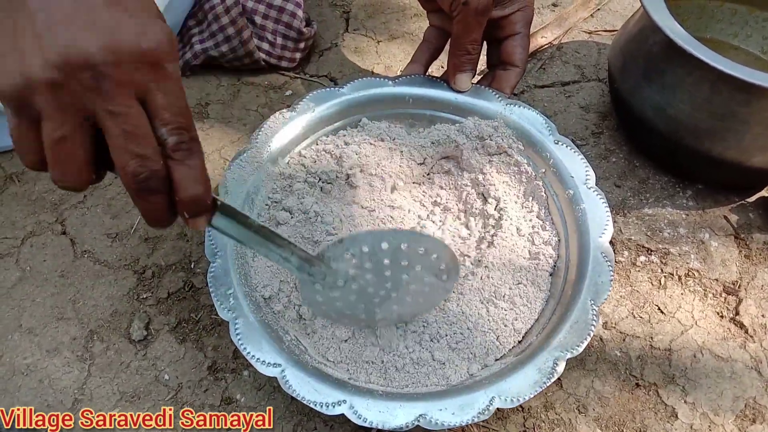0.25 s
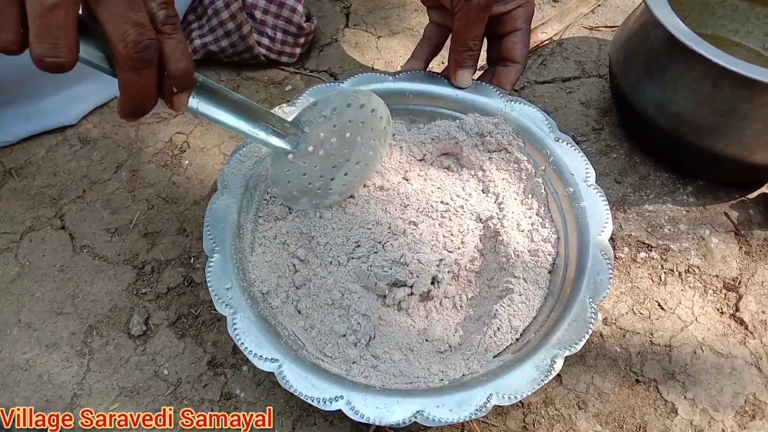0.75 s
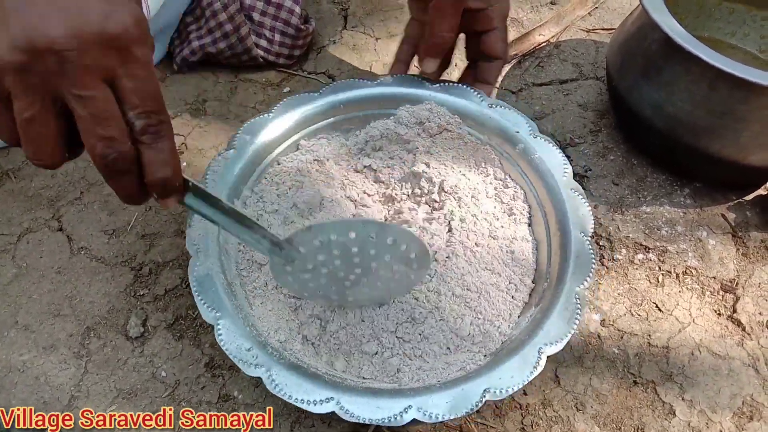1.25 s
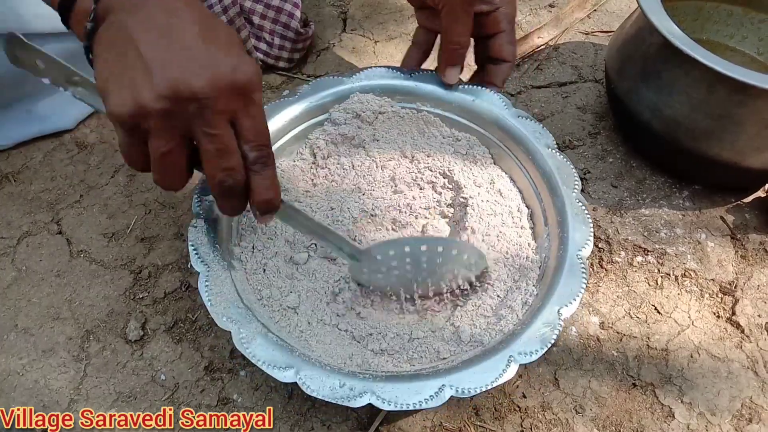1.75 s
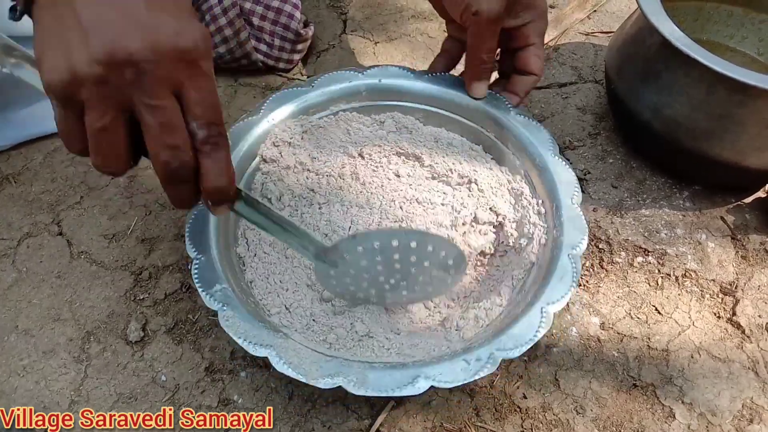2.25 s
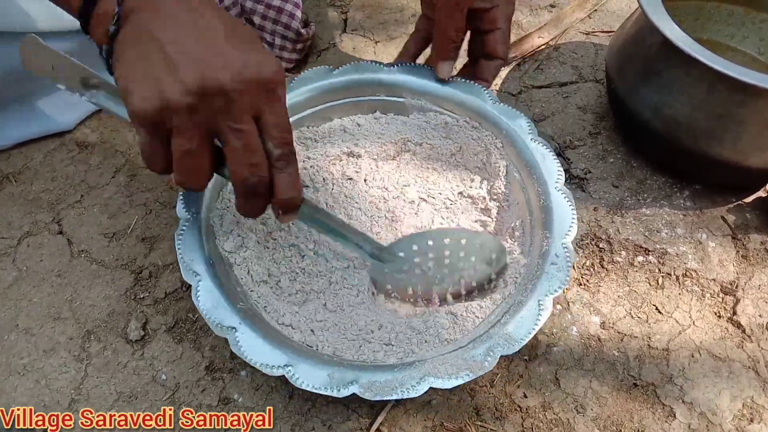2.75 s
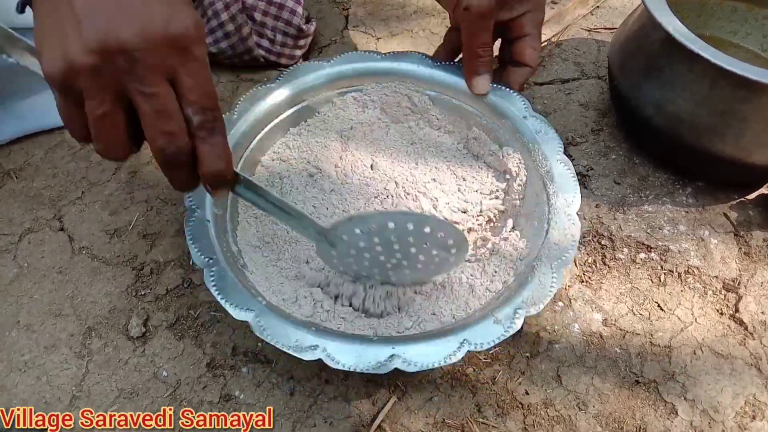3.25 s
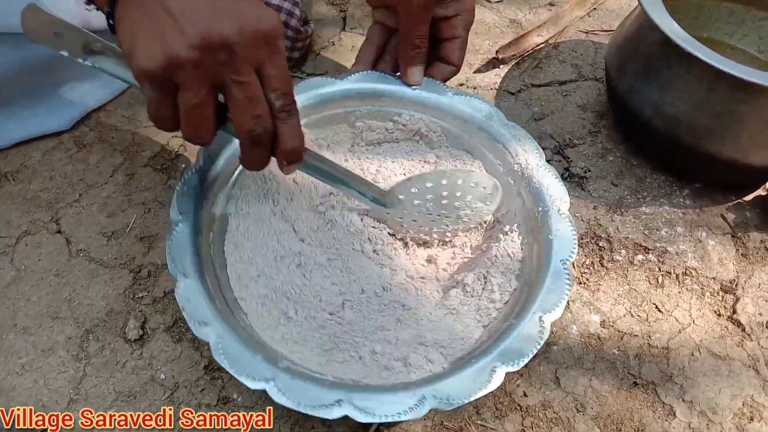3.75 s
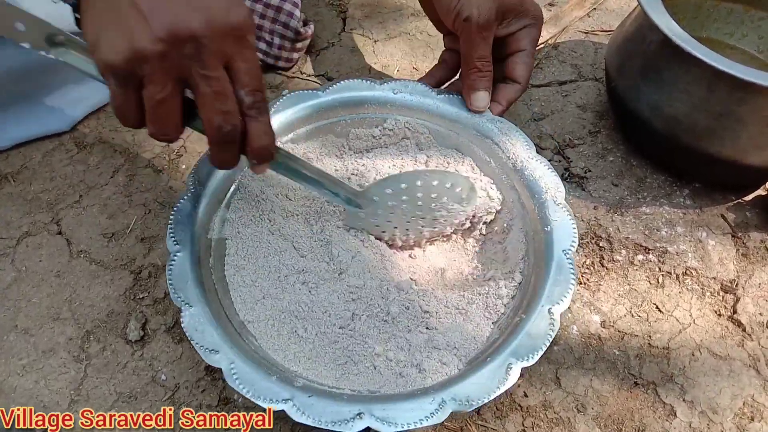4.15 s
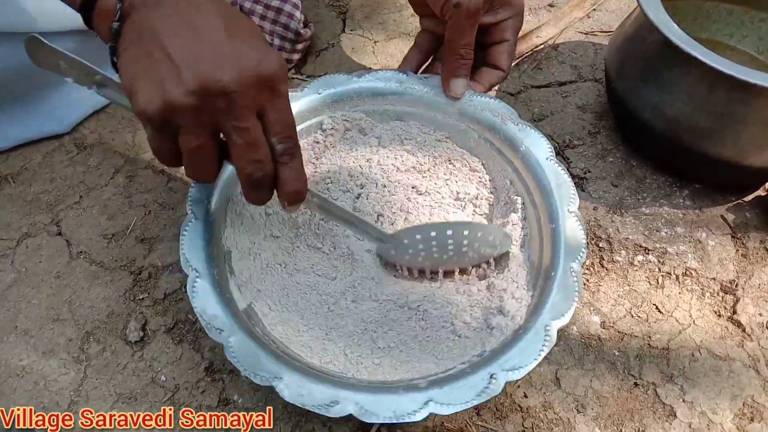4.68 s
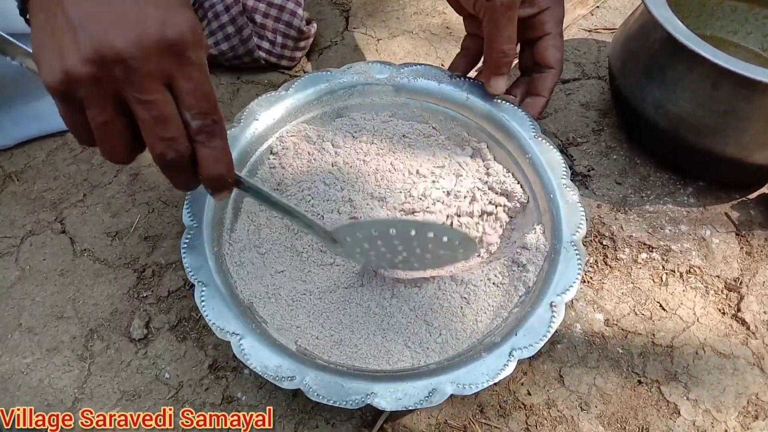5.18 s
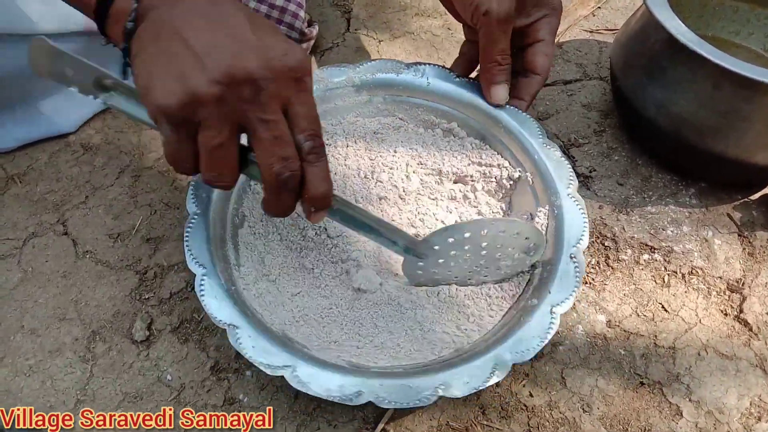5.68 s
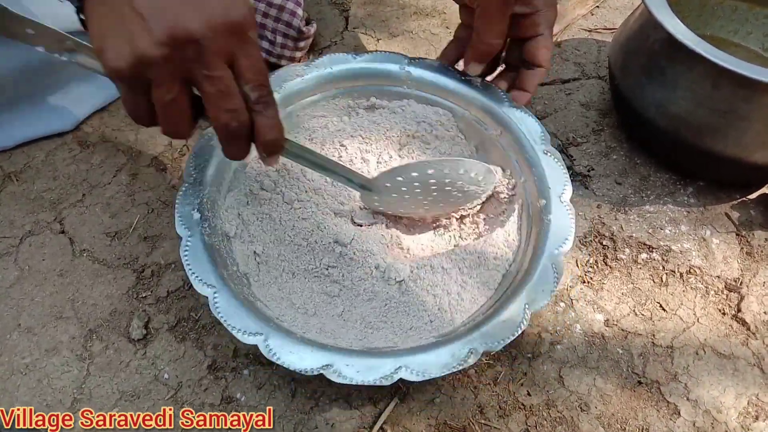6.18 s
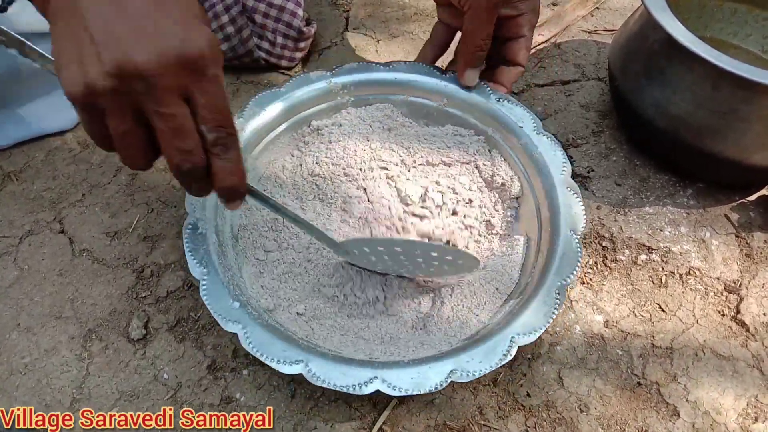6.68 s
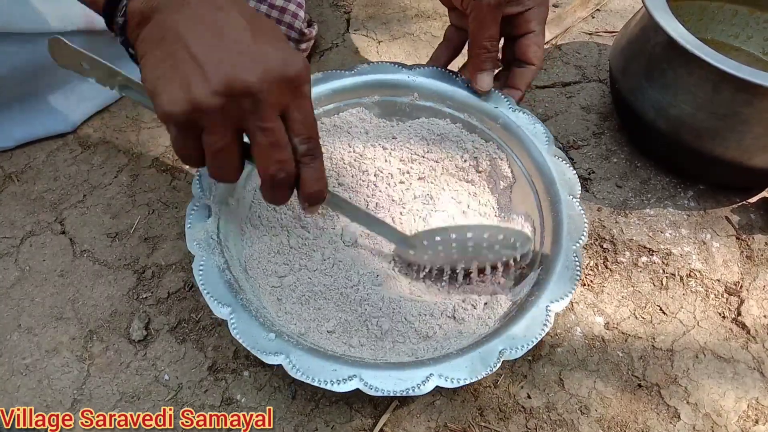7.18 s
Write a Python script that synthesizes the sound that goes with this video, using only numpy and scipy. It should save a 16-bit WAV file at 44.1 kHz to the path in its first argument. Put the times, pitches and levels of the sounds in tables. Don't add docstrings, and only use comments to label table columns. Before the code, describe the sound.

Dense, bright chick peeping outdoors, with a metal skimmer clinking, thudding and scraping through dry flour on a plate above a faint engine throb.

```python
import sys
import numpy as np
from scipy import signal
from scipy.fft import rfft, irfft, next_fast_len
from scipy.io import wavfile
from scipy.ndimage import uniform_filter1d, map_coordinates

SR = 44100
rng = np.random.default_rng(int(sys.argv[2]) if len(sys.argv) > 2 else 0)


def transcribe(u):
    v = np.clip(np.atleast_2d(u).T, -1, 1)
    q = np.round(v * 32767).astype(np.int16)
    wavfile.write(sys.argv[1], SR, q)


def gain_from_decibels(decibels):
    exponent = np.asarray(decibels, float) / 20
    return 10 ** exponent


N = 327221


def unit(x):
    return x / np.sqrt(np.mean(x ** 2) + 1e-20)


def along(points, hz):
    f, v = np.transpose(points)
    return np.interp(np.log(hz + 1), np.log(f + 1), v)


def wobble(rate):
    knots = rng.standard_normal(int(N * rate / SR) + 4)
    return map_coordinates(knots, [np.arange(N) * rate / SR])


def filtered(x, response):
    m = next_fast_len(N + SR // 2)
    hz = np.fft.rfftfreq(m, 1 / SR)
    return irfft(rfft(x, m) * response(hz), m)[..., :N]


def coloured(x, spectrum):
    return filtered(x, lambda hz: gain_from_decibels(along(spectrum, hz)))


def resonant(x, modes):
    def response(hz):
        total = 0
        for k, (centre, width, db) in enumerate(modes):
            mode = 1j * hz * width / (centre ** 2 - hz ** 2 + 1j * hz * width)
            total = total + (-1) ** k * gain_from_decibels(db) * mode
        return total
    return filtered(x, response)


def add(track, s, sound):
    at = round(s * SR)
    sound = sound[max(-at, 0):]
    part = track[max(at, 0):][:len(sound)]
    part += sound[:len(part)]


def patchy(x, patchy_db):
    z = signal.stft(x, nperseg=256)[2]
    field = uniform_filter1d(rng.standard_normal(z.shape), size=5, axis=0)
    field = uniform_filter1d(field, size=8, axis=1)
    return signal.istft(z * gain_from_decibels(patchy_db * unit(field)), nperseg=256)[1][:N]


# (frequency [Hz], density [dB per Hz])
AIR_SPECTRUM = [(40, -6.5), (110, 8), (260, -18.5), (500, -24), (1000, -32), (1250, -11.5), (1700, -19.5),
                (2400, -22.5), (4500, -33.5), (6500, -25), (10500, -37.5), (15000, -36)]


def open_air():
    noise = patchy(rng.standard_normal(N), 3.5)
    return gain_from_decibels(-56 + 1.5 * wobble(6.5)) * unit(coloured(noise, AIR_SPECTRUM))


# (time [s], rate [firings per s])
ENGINE_SPEED = [(0, 17.4), (1, 18.7), (2, 18.534), (3, 18.049), (3.9, 17.285), (4.7, 16.23), (5.4, 15.984),
                (6.3, 16.429), (7.42, 17.065)]
# (frequency [Hz], width [Hz], level [dB])
EXHAUST_PIPE = [(70, 16, -1.5), (110, 50, -4), (176, 77, -12.5)]


def engine():
    s, rate = np.transpose(ENGINE_SPEED)
    firings = np.cumsum(np.interp(np.arange(N) / SR, s, rate)) / SR
    half_cycle = np.floor(2 * (firings + .112))
    pulses = np.diff(half_cycle, prepend=half_cycle[0])
    beat = pulses * np.where(half_cycle % 2, -.25, 1) * gain_from_decibels(1.3 * wobble(24))
    throb = resonant(resonant(beat, EXHAUST_PIPE), [(109.7, 45, 0)])
    return gain_from_decibels(np.linspace(-57, -52.5, N)) * unit(throb)


# (time [s], length [s], pitch [Hz], mid-note sag [Hz], level [dB])
FAR_BIRD_CALLS = [
    (0.108, 0.16, 1250, -1.5, -57.5),
    (1.3, 0.196, 1230, 30.5, -55.5),
    (5.672, 0.13, 3090, 203, -49),
    (5.788, 0.23, 1720, 57, -57),
    (5.871, 0.12, 3430, 398, -49.5),
    (6.266, 0.18, 1714, 3, -58.5),
    (6.66, 0.21, 1714, 5.5, -59),
]


def far_bird():
    out, drift, hoarse = np.zeros(N), wobble(60), wobble(200)
    for s, length, pitch_hz, sag_hz, db in FAR_BIRD_CALLS:
        span = round(s * SR) + np.arange(round(length * SR))
        arch = np.hanning(len(span))
        hz = (pitch_hz - sag_hz * arch) * (1 + 0.019 * drift[span])
        tone = np.sin(2 * np.pi * np.cumsum(hz) / SR)
        add(out, s, gain_from_decibels(db + 2.55 * hoarse[span]) * arch ** 0.19 * tone)
    return out


# (frequency [Hz], t60 [s])
YARD_DECAY = [(2000, 0.13), (5000, 0.22)]


def yard(x, piece=8192):
    out = np.zeros(N)
    for at in range(0, N, piece):
        hz, t, z = signal.stft(rng.standard_normal(SR // 3), SR, nperseg=256)
        decay = gain_from_decibels(-60 * t / along(YARD_DECAY, hz)[:, None])
        tail = signal.istft(z * decay, SR, nperseg=256)[1]
        tail /= np.linalg.norm(tail)
        add(out, at / SR + .004, signal.fftconvolve(x[at:at + piece], tail))
    return out


# (time [s], length [s], start [Hz], bend of the fall, level [dB])
NEAR_PEEPS = [(.005, 0.17, 5997, 3.3, -35.5), (0.377, 0.2, 6173, 2.37, -37), (0.583, 0.13, 6100, 2.9, -39),
              (0.725, 0.24, 5724, 3.9, -34.5), (0.912, 0.1397, 6300, 2.56, -37),
              (1.187, 0.12, 4833, 4.44, -33.5), (1.203, .19, 5990, 2.8, -33.5),
              (1.434, .15, 6690, 1.9, -40.5), (1.666, 0.19, 5920, 3.3, -33), (2, .17, 5930, 3.17, -34),
              (2.363, 0.18, 5913, 3.36, -34), (2.73, .19, 6090, 3.1, -32.5),
              (2.917, .14, 5350, 2.37, -41.5), (3.06, 0.16, 6040, 2.53, -32), (3.07, .2, 5750, 4.33, -42),
              (3.393, 0.19, 6200, 2.43, -35), (3.79, .21, 6170, 3.7, -36), (4.186, 0.22, 6260, 2.43, -38),
              (4.54, .15, 6120, 3.5, -34.5), (4.73, 0.18, 5650, 3.9, -42), (4.899, 0.17, 5987, 3.84, -34),
              (4.935, 0.21, 5300, 2.3, -44), (5.125, .145, 6050, 2.7, -47.5),
              (5.411, 0.24, 6120, 2.25, -43), (5.718, 0.2, 5900, 3.85, -43.5),
              (6.129, 0.17, 6050, 2.6, -38), (6.445, 0.15, 6080, 3.2, -33), (6.594, 0.14, 5700, 3.1, -39),
              (6.8, .19, 5980, 3.23, -36.5), (7.037, .19, 5800, 3.1, -41.5), (7.132, .18, 5880, 3.7, -32.5)]
# (time [s], length [s], start [Hz], end [Hz], level [dB])
SHORT_PEEPS = [(0.205, .11, 5900, 3500, -43), (0.295, 0.098, 4710, 3010, -42),
               (0.315, .09, 4800, 4730, -56), (.595, 0.047, 3480, 2920, -34), (1.2, 0.076, 4740, 3200, -48),
               (1.433, 0.073, 4770, 2400, -45), (1.416, .06, 5500, 5090, -39),
               (1.669, .09, 5000, 2900, -37), (2.042, 0.042, 4700, 3360, -34),
               (2.129, 0.19, 5600, 5340, -40.5), (2.308, 0.07, 5380, 3900, -52),
               (2.419, 0.086, 5050, 3136, -41.5), (2.65, .1, 5050, 3810, -36),
               (3.257, 0.074, 5750, 5740, -48), (3.345, 0.17, 5240, 5050, -36.5),
               (3.432, 0.061, 5000, 3340, -35), (3.82, 0.07, 5450, 4000, -41),
               (3.86, 0.11, 4840, 3360, -58), (4.234, .08, 5380, 4900, -33),
               (4.271, 0.085, 4501, 2630, -36.5), (4.392, 0.078, 5960, 5340, -48),
               (4.458, 0.21, 6200, 3460, -42.5), (4.499, 0.097, 5370, 3770, -39.5),
               (4.828, .13, 4500, 3060, -51), (5.721, .14, 5270, 3300, -53),
               (5.793, 0.069, 4790, 4700, -35), (6.081, 0.073, 4260, 3740, -40.5),
               (6.316, 0.065, 4920, 4800, -52), (6.389, 0.076, 5000, 3500, -48),
               (6.74, 0.059, 5200, 4040, -57), (6.75, 0.15, 5620, 5400, -42),
               (7.001, 0.076, 5460, 3950, -46), (7.042, 0.091, 6100, 3760, -39),
               (7.352, 0.089, 4770, 3390, -42)]
# (time [s], length [s], start [Hz], level [dB])
LATE_PEEPS = [(0.119, 0.25, 5910, -47.5), (0.656, .2, 5700, -45), (1.133, 0.098, 5590, -45.5),
              (1.569, 0.2, 5980, -47), (2.383, .14, 5350, -46.5), (3.655, 0.21, 6320, -46.5),
              (5.358, 0.14, 6170, -34.5), (6.264, .22, 5670, -42.5), (7.304, .14, 5600, -41)]
# (time [s], length [s], start [Hz], level [dB])
ROUND_PEEPS = [(0.277, 0.25, 5920, -43), (0.706, 0.093, 6510, -43), (4.676, 0.13, 6310, -50.5),
               (1.833, 0.13, 6120, -41), (2.291, 0.08, 5610, -45.5), (2.594, 0.22, 6120, -40.5),
               (3.409, .25, 5995, -45), (3.969, 0.19, 6030, -45.5), (4.135, 0.049, 5440, -33.5),
               (4.72, 0.063, 5570, -38.5)]
# (time [s], length [s], start [Hz], level [dB])
LOW_PEEPS = [(.389, 0.093, 5240, -41.5), (.579, 0.029, 4800, -25.5), (1.222, 0.19, 4780, -50),
             (1.54, .15, 4950, -36.5), (1.949, 0.19, 4950, -37), (2.159, .15, 5020, -39.5),
             (3.68, .18, 5050, -43.5), (4.297, 0.12, 5300, -40), (4.58, 0.16, 4920, -41.5),
             (5.072, 0.095, 5180, -37), (5.13, 0.098, 4910, -33), (5.313, 0.2, 4894, -46),
             (5.549, .15, 4883, -38), (6.808, 0.21, 4970, -44)]
# (time [s], length [s], start [Hz], level [dB])
SLIDING_PEEPS = [(-.03, 0.066, 4210, -37), (0.754, 0.11, 5005, -43.5), (3.766, 0.068, 4350, -43),
                 (5.3, 0.24, 3430, -49.5), (6.137, 0.16, 5260, -39.5)]
# (time [s], length [s], start [Hz], level [dB])
HELD_PEEPS = [(.496, 0.24, 4930, -41), (1.182, 0.16, 5690, -35.5), (5.439, 0.14, 4690, -42.5),
              (5.974, .12, 5590, -44), (5.881, 0.2, 4840, -51), (6.471, 0.25, 4680, -49.5)]
# (end [Hz], bend of the fall)
MANNERS = [
    (3590, 4.2),
    (3430, 2.2),
    (2930, 5),
    (2400, 1.5),
    (4800, 2.2),
]


def brood():
    calls = [(s, length, hz, 2327, bend, db) for s, length, hz, bend, db in NEAR_PEEPS]
    calls += [(s, length, hz, end_hz, 2.2, db) for s, length, hz, end_hz, db in SHORT_PEEPS]
    groups = (LATE_PEEPS, ROUND_PEEPS, LOW_PEEPS, SLIDING_PEEPS, HELD_PEEPS)
    for group, (end_hz, bend) in zip(groups, MANNERS):
        calls += [(s, length, hz, end_hz, bend, db) for s, length, hz, db in group]
    return calls


def stragglers(count=45):
    high = [call for call in brood() if call[2] > 4500]
    calls, cues = rng.choice(high, size=(2, count))
    calls[:, 0] = cues[:, 0] + rng.normal(0, 0.036, count)
    calls[:, 2:4] *= rng.normal(1, 0.065, (count, 1))
    calls[:, 5] = -55
    return calls


# (frequency [Hz], level [dB])
THROAT_SPECTRUM = [(2000, -13.5), (3000, -1.5), (3700, -0.5), (4300, 0.5), (5000, 3.5), (5800, 1.5),
                   (6500, 4), (9000, -22), (13000, -40)]


def chicks(calls):
    lowest_hz, snap_hz, snap_drop_hz = 2150, 5050, 449.6
    out, quaver, flutter, flicker = np.zeros(N), wobble(90), wobble(150), wobble(28)
    for (s, length, start_hz, end_hz, bend, db), (own, *walls) in zip(calls, rng.random((len(calls), 4))):
        u = np.arange(round(length * 1.09 * SR)) / (length * SR)
        mine = (int(own * N) + np.arange(len(u))) % N
        hz = start_hz - (start_hz - end_hz) * u ** bend
        hz = lowest_hz + 150 * np.logaddexp(0, (hz - lowest_hz) / 150)
        fallen = np.clip((start_hz - hz) / 900, 0, 1)
        snapped = np.clip((hz - 3100) / 1900, 0, 1) / (1 + np.exp((hz - snap_hz) / 90))
        hz = hz - snap_drop_hz * fallen * snapped
        waver = (.008 + .022 * fallen) * quaver[mine]
        turn = 2 * np.pi * np.cumsum(hz * (1 + waver)) / SR
        edge = np.clip(np.minimum(u * length / 0.0062, (u[-1] - u) * length / 0.047), 0, 1)
        shelf = fallen * np.exp(-((hz - 4150) / 450) ** 2)
        rough_db = (3 + 4.5 * fallen) * flutter[mine] + 1.5 * flicker[mine]
        onset_db = -13 * (1 - np.minimum(2 * u, 1)) ** 2
        level_db = db - 3.5 + onset_db + 7 * shelf + rough_db
        octave = gain_from_decibels(-10.5) * fallen / (1 + np.exp((hz - 5000) / 300)) * np.clip(hz / 500 - 6, 0, 1)
        peep = gain_from_decibels(level_db) * edge * (np.sin(turn) + octave * np.sin(2 * turn))
        add(out, s, peep)
        for late in walls:
            add(out, s + .003 + .022 * late, gain_from_decibels(-7 - 8 * late) * peep)
    return coloured(out, THROAT_SPECTRUM)


def grains(per_s, spread_db):
    hit = rng.random(N) < per_s / SR
    contact = hit * gain_from_decibels(spread_db * (-0.5 + rng.random(N)))
    return unit(rng.standard_normal(N) * (1 + contact))


def strokes(rows, rest_db, order):
    t = np.arange(N) / SR
    power = gain_from_decibels(rest_db) ** 2
    for s, rise, fall, db in rows:
        away = np.where(t < s, (s - t) / rise, (t - s) / fall)
        power = power + gain_from_decibels(db - 20 * away ** order) ** 2
    return 10 * np.log10(power)


# (peak time [s], rise [s], fall [s], level [dB])
SIFT_STROKES = [(.41, 0.097, 0.16, -65.5), (.93, 0.083, 0.017, -56.5), (1.13, 0.016, .025, -58.5),
                (1.6, 0.22, 0.27, -58.5), (1.74, 0.033, .04, -67), (1.96, 0.065, 0.13, -57),
                (2.09, 0.17, 0.13, -54.5), (2.37, 0.048, 0.3, -54), (2.77, 0.27, 0.047, -57.5),
                (3.02, 0.082, 0.14, -52), (3.12, .05, 0.083, -54.5), (3.21, 0.028, 0.071, -56.5),
                (3.38, 0.033, 0.082, -51.5), (3.69, 0.026, 0.17, -49), (4.05, 0.017, 0.027, -51),
                (4.23, 0.12, 0.11, -48), (4.36, 0.019, 0.096, -67), (4.69, 0.2, 0.2, -51.5),
                (5.06, 0.1, .14, -56.5), (5.42, 0.088, 0.13, -56), (5.69, 0.022, 0.18, -52),
                (6.1, 0.038, 0.074, -51), (7.15, 0.015, 0.056, -47), (7.42, 0.062, .1, -53)]
# (peak time [s], rise [s], fall [s], level [dB])
SCRAPE_STROKES = [(.41, 0.018, 0.34, -58), (.935, 0.029, 0.055, -35), (1.13, 0.021, 0.05, -62),
                  (1.26, 0.16, 0.0085, -44.5), (1.4, 0.13, 0.81, -57.5), (1.74, 0.014, 0.024, -38.5),
                  (2.1, 0.14, 0.11, -47), (2.37, 0.13, 0.42, -53.5), (3.01, 0.022, 0.041, -37),
                  (3.12, 0.041, 0.029, -48), (3.171, 0.008, 0.062, -43), (3.22, 0.02, 0.029, -40),
                  (3.37, 0.062, 0.19, -48), (3.68, 0.0072, 0.02, -28), (3.74, 0.08, 0.16, -46),
                  (4.05, 0.032, 0.037, -46.5), (4.23, 0.36, 0.73, -56.5), (5.03, 1, 0.22, -59.5),
                  (5.42, 0.11, 0.037, -49), (5.69, 0.013, 0.029, -27), (5.8, 0.072, 0.064, -46),
                  (6.1, 0.045, 0.13, -46.5), (6.42, 0.0077, 0.058, -37.5), (6.82, 0.14, 0.042, -53),
                  (7.15, 0.01, 0.093, -47)]
# (frequency [Hz], density [dB per Hz])
GRIT_SPECTRUM = [(2000, -23), (4000, -8), (6200, 5), (7200, -11.5), (9600, -16.5), (11000, -25),
                 (13500, -31), (14700, -13), (15500, -20)]
# (frequency [Hz], width [Hz], level [dB])
PLATE_MODES = [(353, 520, -8.5), (550, 140, -5.5), (911, 147, 0.5), (1252.4, 49, 9), (1590, 345, 0.5),
               (1860, 4400, -16)]


def stirring():
    sift_db = strokes(SIFT_STROKES, rest_db=-81, order=2) + 11.5 + 1.8 * wobble(30)
    scrape_db = strokes(SCRAPE_STROKES, rest_db=-70, order=1) - 2 + 3.5 * wobble(70)
    sift = unit(coloured(patchy(grains(500, spread_db=13), 5), GRIT_SPECTRUM))
    drag = uniform_filter1d(grains(250, spread_db=12), size=11)
    scrape = unit(resonant(drag, PLATE_MODES))
    return gain_from_decibels(sift_db) * sift + gain_from_decibels(scrape_db) * scrape


# (time [s], peak level [dB], thump pitch [Hz], ring level [dB])
PLATE_THUMPS = [(0.402, -37.5, 278, 0), (0.468, -49, 181, 0), (0.901, -43.5, 131, 7),
                (1.126, -27.5, 208, 6), (1.181, -39, 180, -18), (1.367, -36, 135, -9),
                (1.732, -30, 181, -7.5), (2.051, -44.5, 300, 5), (2.101, -30.5, 231, -4),
                (2.369, -32.5, 214, -19), (2.726, -38.5, 152, 0.5), (2.998, -43, 364, -24),
                (3.0997, -25.5, 133, -26), (3.114, -23.5, 192, -2.5), (3.361, -40.5, 236, 10),
                (3.671, -38, 380, 7), (3.788, -17.5, 179, -16), (3.812, -45, 152, 0), (4.04, -37, 269, -18),
                (4.349, -26, 197, -4.5), (5.356, -48, 110, -1), (5.684, -40, 374, -4),
                (5.787, -24, 145, -10), (6.087, -49, 155, 8.5), (6.404, -37, 187, 1.5),
                (6.54, -47, 223, 10.5), (6.822, -59.5, 276, 18.5), (7.133, -48.5, 383, 10.5),
                (7.193, -28.5, 130, -27)]
# (time [s], peak level [dB], pitch [Hz])
RIM_CLINKS = [(0.491, -36, 1450), (0.889, -48, 1260), (0.926, -24, 1160), (1.126, -15, 1236),
              (1.255, -23, 1230), (1.396, -41, 1290), (2.01, -39, 1430), (2.355, -38, 1550),
              (3.005, -29, 1210), (3.115, -20, 1210), (3.168, -26.5, 1210), (3.212, -27, 850),
              (3.221, -26, 1240), (3.675, -22.5, 860), (3.739, -29, 1900), (4.138, -46.5, 855),
              (4.353, -11.5, 1306), (5.404, -33, 904), (5.681, -23, 860), (6.139, -32, 921),
              (6.811, -33, 1590), (6.823, -33, 1680), (7.136, -26, 1560)]
# (time [s], peak level [dB])
GRIT_TICKS = [(1.1278, -33.5), (1.7308, -39), (1.953, -37.5), (2.2502, -39), (2.352, -40), (2.36, -30.5),
              (2.47, -39.5), (2.609, -39.5), (2.7826, -34.5), (3.004, -35.5), (3.0184, -34.5),
              (3.2143, -36), (3.365, -36), (3.6761, -27.5), (3.706, -32), (3.74, -27.5), (4.05, -33.5),
              (4.1149, -34), (4.1814, -33), (4.351, -35.5), (4.6103, -40), (4.7207, -34.5), (4.8284, -34),
              (5.3032, -39.5), (5.684, -28), (6.329, -48.5), (6.813, -37), (7.1375, -35.5), (7.149, -30)]


def knocks():
    out, blows, cracks = np.zeros(N), np.zeros(N), np.zeros(N)
    t = np.arange(SR // 12) / SR
    for s, db, hz, ring_db in PLATE_THUMPS:
        swell = 1 - np.exp(-(t / .0032) ** 2)
        add(out, s + 0.0008, gain_from_decibels(db + 26.5 - 60 * t / 0.017) * swell * np.sin(2 * np.pi * hz * t))
        add(blows, s + 0.002983, gain_from_decibels([db + ring_db + 36]))
    for s, db, hz in RIM_CLINKS:
        attack = 1 - np.exp(-t / 0.0011)
        add(out, s, gain_from_decibels(db + 0.5 - 60 * t / .02) * attack * np.sin(2 * np.pi * hz * t))
    for s, db in GRIT_TICKS:
        add(cracks, s, gain_from_decibels(db + 14.5 - 60 * t / 0.019) * rng.standard_normal(len(t)))
    ring = resonant(uniform_filter1d(blows, size=19), PLATE_MODES)
    return out + ring + coloured(cracks, GRIT_SPECTRUM)


def scene():
    background = open_air() + engine() + far_bird()
    peeps = chicks(brood()) + chicks(stragglers())
    steel = knocks()
    echoes = yard(gain_from_decibels(-6.5) * peeps + gain_from_decibels(-11.0) * steel)
    mono = background + echoes + peeps + stirring() + steel
    return np.array([mono, mono])


def roll_off(x):
    return signal.sosfilt(signal.butter(12, 16800, fs=SR, output="sos"), x)


def record(dry):
    heard = filtered(dry, lambda hz: (1j * hz / (55 + 1j * hz)) ** 3 * (hz < 15800))
    # (frequency [Hz], level [dB])
    tint = [(40, 13), (200, 4), (700, 6), (1400, 14), (2800, 6), (5000, 0)]
    hiss = gain_from_decibels(-74.0) * filtered(rng.standard_normal(N), lambda hz: hz < 15800)
    side = gain_from_decibels(-36.5) * wobble(40) * coloured(heard[0], tint) + hiss
    return roll_off(heard + np.array([side, -side]))


dry = scene()
out = record(dry)
transcribe(out)
```